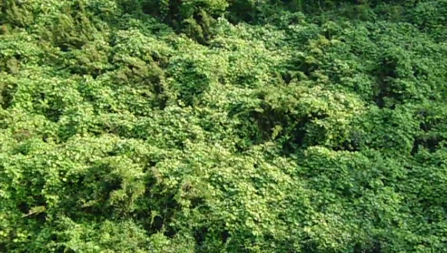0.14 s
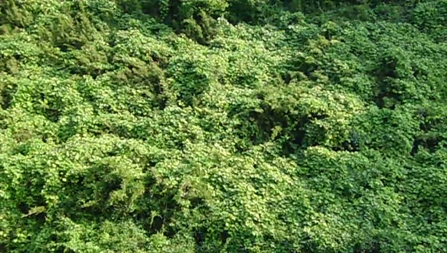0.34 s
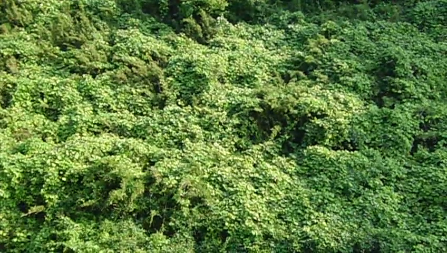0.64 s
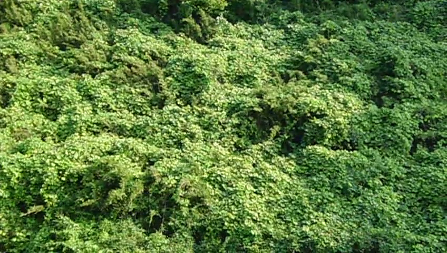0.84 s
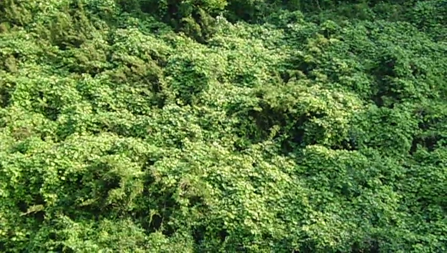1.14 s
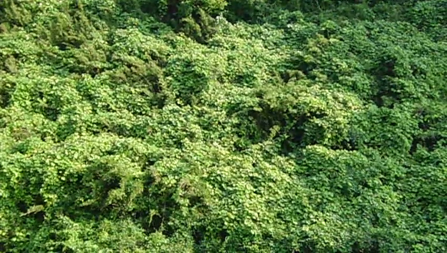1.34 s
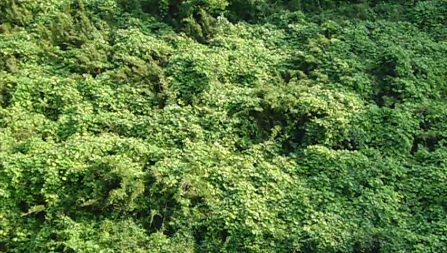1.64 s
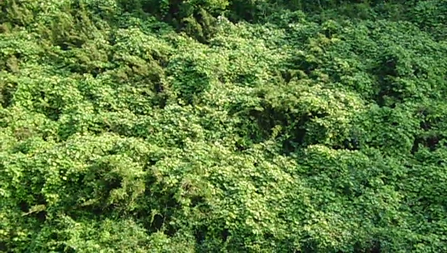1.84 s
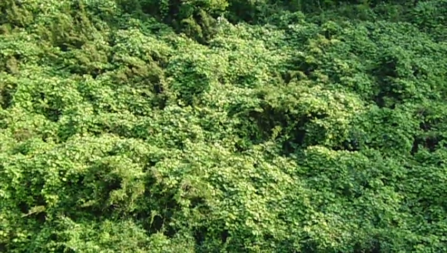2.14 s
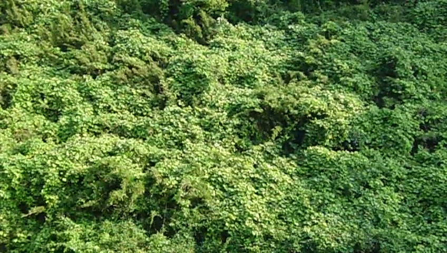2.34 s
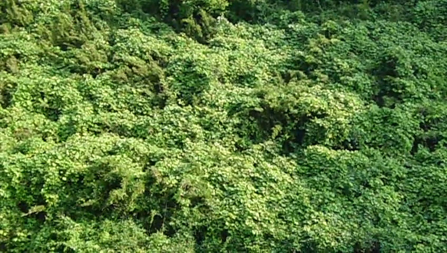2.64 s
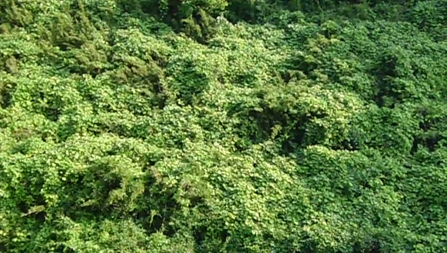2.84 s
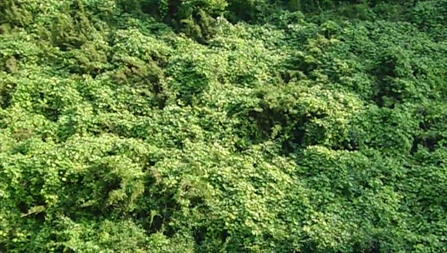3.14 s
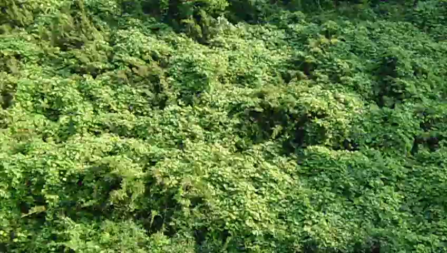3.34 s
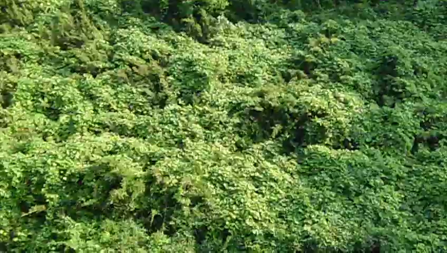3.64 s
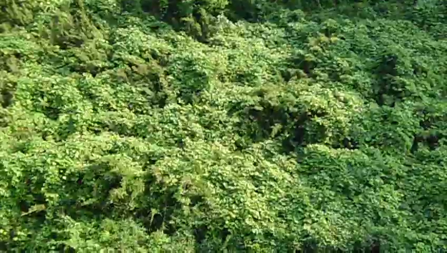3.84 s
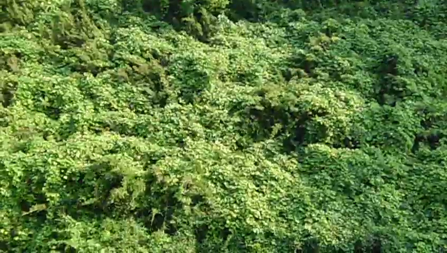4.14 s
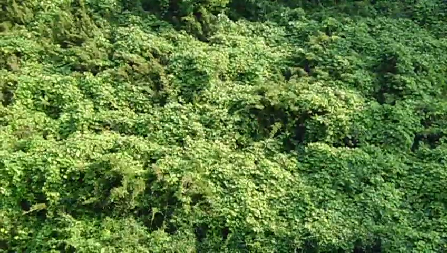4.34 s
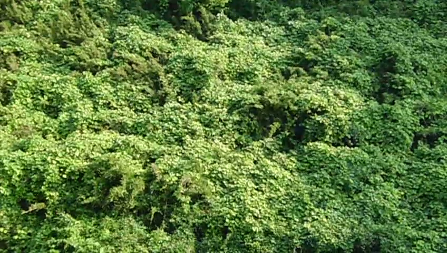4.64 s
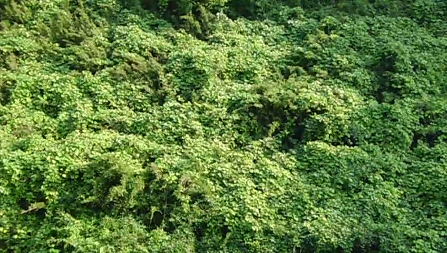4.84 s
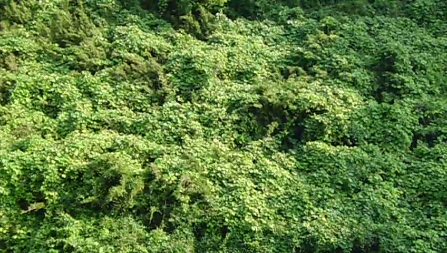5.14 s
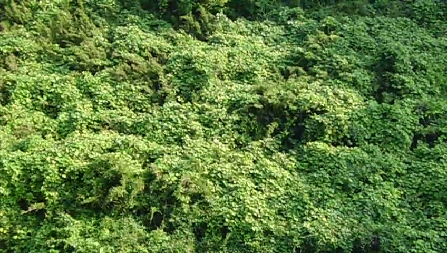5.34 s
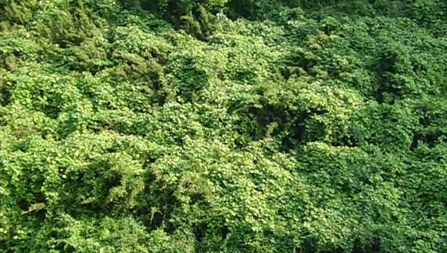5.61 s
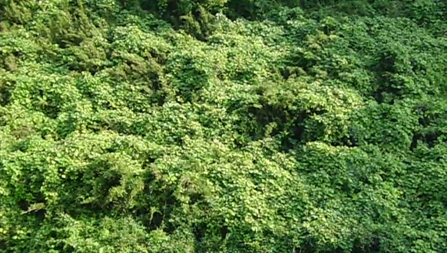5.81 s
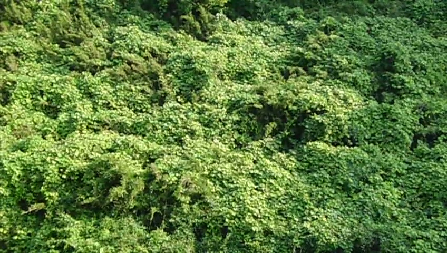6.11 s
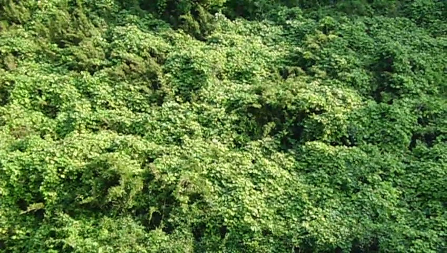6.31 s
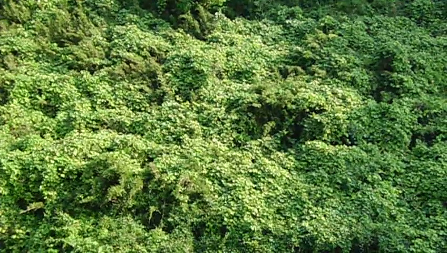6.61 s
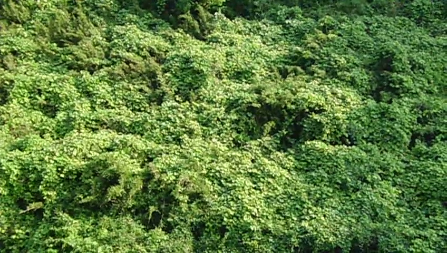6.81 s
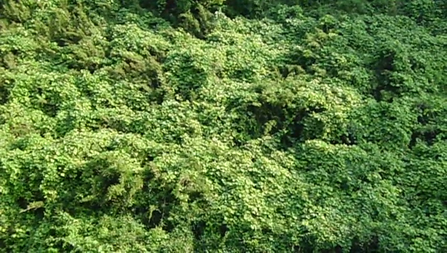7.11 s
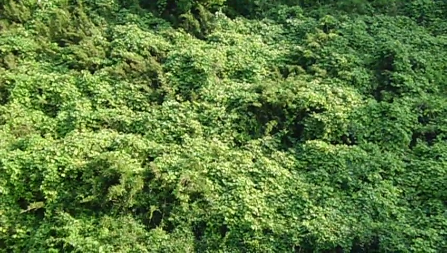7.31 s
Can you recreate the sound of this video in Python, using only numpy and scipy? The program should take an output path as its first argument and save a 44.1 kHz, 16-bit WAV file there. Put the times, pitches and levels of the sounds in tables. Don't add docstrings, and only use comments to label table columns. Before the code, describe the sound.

Outdoor insect chorus, recorded in mono from some distance. Shrill cicada pulses repeat about eight times a second, joined by thin upward-creeping buzzes and a dry, very fast high rattle. Just before four seconds a single bird call swells softly and snaps into four quick notes, echoing off the slopes. A tiny dull knock comes next. The rattle fades and the cicadas droop in pitch over faint breeze, distant traffic and hiss.

```python
import sys
import numpy as np
from scipy import signal
from scipy.fft import rfft, irfft, next_fast_len
from scipy.io import wavfile
from scipy.ndimage import uniform_filter1d, map_coordinates

SR = 44100
rng = np.random.default_rng(int(sys.argv[2]) if len(sys.argv) > 2 else 0)


def natural_amplitude(level_db):
    exponent = np.asarray(level_db, float) / 20
    return 10 ** exponent


def put_to_file(sound):
    columns = np.atleast_2d(sound).T
    safe = np.clip(columns, -1, 1)
    whole_steps = np.round(safe * 32767)
    wavfile.write(sys.argv[1], SR, whole_steps.astype(np.int16))


N = 329427
TIME = np.arange(N) / SR


def unit(x):
    return x / np.sqrt(np.mean(np.abs(x) ** 2) + 1e-20)


def along(points, hz):
    f, v = np.transpose(points)
    return np.interp(np.log(hz + 1), np.log(f + 1), v)


def curves(rows, t=TIME):
    s, *columns = np.transpose(rows)
    return [np.interp(t, s, column) for column in columns]


def wobble(rate):
    knots = rng.standard_normal(int(N * rate / SR) + 4)
    return map_coordinates(knots, [TIME * rate])


def coloured(x, spectrum):
    m = next_fast_len(N + 8192)
    gain = natural_amplitude(along(spectrum, np.fft.rfftfreq(m, 1 / SR)))
    return irfft(rfft(x, m) * gain, m)[:N]


def rush(spectrum, patchy_db):
    z = signal.stft(rng.standard_normal(N), nperseg=512)[2]
    field = uniform_filter1d(rng.standard_normal(z.shape), 5, 0)
    field = uniform_filter1d(field, 12, 1)
    noise = signal.istft(z * natural_amplitude(patchy_db * unit(field)), nperseg=512)[1][:N]
    return unit(coloured(noise, spectrum))


def whistle(rows):
    hz, db = curves(rows)
    on = (TIME > rows[0][0]) & (TIME < rows[-1][0])
    return on * np.sqrt(2) * natural_amplitude(db) * np.sin(2 * np.pi * np.cumsum(hz) / SR)


# frequency in Hz, time to fall 60 dB in seconds.
SLOPE_DECAY = [(800, 0.85), (2500, 0.75), (4200, 0.78), (9000, 0.59)]


def slope(x, wet_db):
    hz, t, z = signal.stft(rng.standard_normal(SR // 2), SR, nperseg=256)
    fall = natural_amplitude(-60 * t / along(SLOPE_DECAY, hz)[:, None])
    tail = signal.istft(z * fall, SR, nperseg=256)[1]
    late = np.pad(x, (600, 0))
    return natural_amplitude(wet_db) * signal.fftconvolve(late, tail / np.linalg.norm(tail))[:N]


def phrase(marked, steps, scatter_db=1.5, uneven=1):
    marks = np.cumsum([0] + steps)
    place = np.arange(marks[-1] + 1)
    rows = np.transpose([np.interp(place, marks, column) for column in np.transpose(marked)])
    scatter = [uneven * .005, uneven * 6, scatter_db]  # s, Hz, dB
    return rows + rng.standard_normal(rows.shape) * scatter


def singer(rows, tones_db, stroke_db, count, sag, gain_db=0):
    out, length = np.zeros(N + SR), .044
    lead_in = .1
    t = np.arange(round(.06 * SR)) / SR
    swell = natural_amplitude(5.9 * (t / length - 1))
    shape = swell * np.clip(t / 0.005, 0, 1) * np.clip((length - t) / .004 + 1, 0, 1)
    rows = np.array(rows)
    jitter = uniform_filter1d(rng.standard_normal((len(rows), 2, len(t))), 90, axis=2)
    drift, slip = jitter.transpose(1, 0, 2)
    click_hz = rows[:, 1:2] / 2 * (1 + sag * (.55 - t / length) + .022 * drift)
    start = count * rng.random((len(rows), 1))
    turn = 2j * np.pi * (np.cumsum(click_hz, axis=1) / SR + start)
    stack = np.polyval(natural_amplitude(tones_db)[::-1], np.exp(turn)) * np.exp(turn)
    muscle = turn / count + 3j * slip
    stroke = np.polyval(natural_amplitude(stroke_db)[::-1], np.exp(muscle)) * np.exp(-2 * muscle)
    level = natural_amplitude(rows[:, 2:] + gain_db + 2.5 + 12.0 * slip)
    calls = (stack * stroke).real * shape * level
    for s, call in zip(rows[:, 0], calls):
        out[round((s - .033 + lead_in) * SR):][:len(t)] += call
    return out[round(lead_in * SR):][:N]


STEPS = dict(NEAR=[2, 3, 2, 6, 8, 4, 3, 3], THIN=[3, 3, 6, 10], RISING=[4, 3, 3, 6, 5, 4, 3, 7],
         LOUD=[4, 2, 2, 1, 4, 1, 3, 3], HIGH=[1, 2, 2], LOW=[3, 6, 3, 3, 3, 7], AFTER=[1, 2, 5],
         LATE=[3, 3, 3, 3, 3], LAST=[1, 2, 5, 3])
# time in seconds, main pitch in Hz, level in dB.
NEAR = [
    (0.017, 4095, -68.8),
    (0.231, 4079, -62.2),
    (0.597, 4068, -61.4),
    (0.847, 4051, -57.6),
    (1.593, 4047, -58.1),
    (2.609, 4032, -58.2),
    (3.127, 4026, -54.4),
    (3.528, 4020, -58.4),
    (3.963, 4018, -59.4),
]
# time in seconds, main pitch in Hz, level in dB.
AFTER = [
    (4.074, 4031, -61.8),
    (4.198, 4014, -62.6),
    (4.545, 4031, -64.2),
    (5.163, 4029, -63.8),
]
NEAR_TONES = [-22, 2, -9, -17]
NEAR_STROKE = [-34, -11, 2, -32, -32.5, -28.5, -25, -19.5, -17]


def near_singer():
    steady = phrase(NEAR, STEPS["NEAR"], scatter_db=.5, uneven=.3)
    rows = np.vstack([steady, phrase(AFTER, STEPS["AFTER"])])
    fresh = np.clip((rows[:, 1:2] - 4040) / 40, 0, 1)
    sag = .0105 * (1 + fresh)
    return singer(rows, NEAR_TONES, NEAR_STROKE, count=8, sag=sag, gain_db=-0.03 + 0.78 * fresh)


# time in seconds, main pitch in Hz, level in dB.
THIN = [
    (0.317, 4270, -69.5),
    (0.675, 4341, -74.8),
    (1.028, 4438, -75.2),
    (1.719, 4415, -74.4),
    (2.944, 4380, -76.8),
]
RISING = [
    (2.781, 4231, -71.5),
    (3.214, 4401, -63.5),
    (3.688, 4434, -60.5),
    (4.037, 4403, -63.5),
    (4.725, 4386, -60.5),
    (5.337, 4376, -63.5),
    (5.906, 4336, -62.8),
    (6.302, 4326, -67.5),
    (7.14, 4282, -73.5),
]
LOUD = [
    (3.359, 4322, -64.5),
    (3.855, 4320, -65),
    (4.087, 4323, -55.8),
    (4.338, 4310, -56.2),
    (4.455, 4306, -63),
    (4.956, 4279, -60.8),
    (5.095, 4305, -59.5),
    (5.496, 4283, -61.2),
    (5.943, 4226, -67.2),
]
HIGH = [
    (3.619, 4669, -70.8),
    (3.745, 4675, -65.4),
    (3.995, 4666, -70.4),
    (4.261, 4658, -73.2),
]
LOW = [
    (3.913, 3926, -70.4),
    (4.263, 3908, -69.8),
    (5.003, 3892, -69.2),
    (5.401, 3881, -71.5),
    (5.782, 3877, -67),
    (6.163, 3869, -70),
    (7.033, 3836, -74.2),
]
LATE = [
    (5.391, 4011, -66.8),
    (5.772, 4014, -68.4),
    (6.153, 3994, -69.5),
    (6.526, 3989, -67),
    (6.901, 3983, -68),
    (7.321, 3961, -69.5),
]
LAST = [
    (5.941, 4205, -63.5),
    (6.087, 4184, -70.8),
    (6.358, 4156, -71.2),
    (7.055, 4126, -74.2),
    (7.457, 4101, -74.5),
]
OVERTONES = [-16, 0.5, -7, -11]
LOUD_TONES = [-8.5, 1.5, -9.5, -11]
RISING_TONES = [-13, 1.5, -9.5, -11]
LOW_STROKE = [-5, 0, 0, -9, -10, -14, -14, -14, -18]
HIGH_STROKE = [-30, -22, 0, -7, -20, -28, -30, -32, -34]
PLAIN_STROKE = [-18, -16, -1, -27, -23, -26, -21, -26, -25]


def other_singers():
    sag = .003
    low = singer(phrase(LOW, STEPS["LOW"]), NEAR_TONES, LOW_STROKE, count=15, sag=sag, gain_db=-1.0)
    high = singer(phrase(HIGH, STEPS["HIGH"]), NEAR_TONES, HIGH_STROKE, count=7, sag=sag, gain_db=4.0)
    loud = singer(phrase(LOUD, STEPS["LOUD"]), LOUD_TONES, PLAIN_STROKE, count=16, sag=sag, gain_db=-0.8)
    rising = phrase(RISING, STEPS["RISING"])
    rising = singer(rising, RISING_TONES, PLAIN_STROKE, count=16, sag=sag, gain_db=-0.1)
    plain = np.vstack([phrase(THIN, STEPS["THIN"]), phrase(LATE, STEPS["LATE"]), phrase(LAST, STEPS["LAST"])])
    plain = singer(plain, OVERTONES, PLAIN_STROKE, count=16, sag=sag, gain_db=2.5)
    return low + high + loud + rising + plain


def crowd(low_hz, high_hz, tire_hz, tones_db, count):
    rows = []
    for voice, (pace, start) in enumerate(rng.random((count, 2))):
        s = np.arange(start * .13, N / SR, .118 + .02 * pace)
        own_hz = low_hz + (high_hz - low_hz) * voice / (count - 1)
        pitch = own_hz - tire_hz * s + 12 * wobble(0.508)[(s * SR).astype(int)]
        rows += list(np.transpose([s, pitch, 3 * rng.standard_normal(len(s))]))
    direct = singer(rows, tones_db, PLAIN_STROKE, count=16, sag=0.0064)
    return unit(natural_amplitude(-4.5) * direct + slope(direct, 0))


# time in seconds, low voices in dB, high voices in dB.
FAR = [(0.0, -61.5, -79), (0.52, -66.5, -78), (2.49, -76.5, -82.5), (2.93, -69, -72.5), (3.16, -68.5, -62),
       (3.39, -61, -61.5), (3.56, -61.5, -59), (4.93, -65, -58.5), (5.8, -66.5, -61.5),
       (6.03, -69.5, -65.5), (6.41, -66, -63), (6.72, -69.5, -67), (7.47, -70.5, -73)]
CROWD_TONES = [-17, -1, -10, -11]


def far_chorus():
    low_db, high_db = curves(FAR)
    low = natural_amplitude(low_db) * crowd(3801, 4181, 8, OVERTONES, count=9)
    high = natural_amplitude(high_db) * crowd(4350, 4545, 30, CROWD_TONES, count=8)
    return low + high


# frequency in Hz, gain in dB.
BODY = [(1500, 2), (1750, 2), (2300, 4), (2600, -4.5), (3400, -4.5), (3780, -3.5), (4000, -1), (9500, 4),
        (11000, -11)]


def cicadas():
    near, rest = near_singer(), other_singers()
    echoes = slope(near, -9.0) + slope(rest, -8.0)
    return coloured(near + rest + echoes + far_chorus(), BODY)


def buzz(s, length, hz, creep, db):
    u = np.linspace(0, 1, 21)
    fade_db = 16 * abs(2 * u - 1) ** 8
    level = db + 4 * (u - .5) - fade_db
    return whistle(np.transpose([s + u * length, hz + creep * u * length, level]))


# start in seconds, length in seconds, first pitch in Hz,
# creep in Hz per second, loudest level in dB.
PURE_BUZZES = [
    (2.71, 1.49, 5872, 298, -73.2),
    (3.32, 1.79, 5582, 155, -72.2),
    (2.31, 1.29, 6282, 318, -80.2),
]
ROUGH_BUZZES = [
    (1.81, .94, 6512, 258, -76.2),
    (6.61, 1.09, 6402, 258, -77.2),
    (4.38, .32, 4935, 0, -74),
    (2.801, .041, 4902, 0, -72.5),
]
# time in seconds, level in dB.
DRONE = [(0.0, -63), (1.18, -61.5), (2.16, -65.5), (3.04, -66.5), (4.68, -62), (4.91, -66), (5.49, -61.5),
         (5.97, -65), (6.34, -63.5), (6.85, -68), (7.47, -66)]
DRONE_FAR = [(0, -71), (.6, -72.5), (1.18, -69.5), (3.5, -70.5), (7.47, -69.5)]
# frequency in Hz, level in dB per Hz.
DRONE_LOW = [(4500, -27), (5500, -12), (6300, -0.5), (7200, 2), (8000, -1), (9000, -25.5)]
DRONE_MID = [(7000, -23.5), (7800, -2.5), (8700, -0.5), (9800, -8), (10800, -10), (12000, -27),
             (13000, -36)]


def buzzers():
    notes = np.zeros(N)
    for row in PURE_BUZZES:
        notes += buzz(*row) * unit(.8 + wobble(80))
    for row in ROUGH_BUZZES:
        notes += buzz(*row) * unit(wobble(320))
    far = natural_amplitude(curves(DRONE_FAR)[0]) * rush(DRONE_LOW, patchy_db=2.0)
    nearer = natural_amplitude(curves(DRONE)[0] - 1.0) * rush(DRONE_MID, patchy_db=1.2)
    return notes + far + nearer


# time in seconds, how far it faces the microphone in dB.
RATTLE = [(0, 0.5), (1.34, 6.5), (1.37, -3), (2.25, -7.5), (3.66, 3.5), (4.3, -4), (4.55, 2), (4.75, -1),
          (5.72, -1), (5.83, -12), (7.23, -24), (7.47, -17)]
# time in seconds, wing strokes so far.
BEATS = [(0, -.2), (1, 31.94), (2.2, 70.15), (3.4, 108.85), (4.6, 147.38), (5.8, 185.41), (7.47, 238.6)]
# frequency in Hz, level in dB per Hz.
WING = [(6500, -33), (8000, -2), (9300, 3), (10500, -4.5), (12000, -33), (14000, -45)]
EDGE = [(9500, -10.5), (11500, 3.5), (13000, 0), (15600, 1)]


def katydid():
    beat = .5 + .5 * np.cos(2 * np.pi * curves(BEATS)[0])
    teeth = natural_amplitude(1.4 * wobble(22)) * rng.standard_normal(N) * (rng.random(N) < .4)
    facing_db, = curves(RATTLE)
    wing = unit(coloured(beat ** 1.5 * teeth, WING))
    edge = unit(coloured((0.45 + beat ** 2.3) * teeth, EDGE))
    return natural_amplitude(-66 + 0.39 * facing_db) * wing + natural_amplitude(-77 + facing_db) * edge


# time in seconds, pitch in Hz, level in dB.
HOO = [
    (2.98, 922, -92),
    (3.06, 925, -79.5),
    (3.3, 928, -75),
    (3.6, 936, -71),
    (3.74, 926, -76),
    (3.79, 925, -92),
]


def hoo():
    t = np.arange(HOO[0][0], HOO[-1][0], .002)
    hz, db = curves(HOO, t)
    turn = 2 * np.pi * 7.3 * (t - 3.355)
    return whistle(np.transpose([t, hz + 12 * np.cos(turn - 1.4), db + 5 * np.cos(turn)]))


# time in seconds, pitch in Hz, level in dB.
QUICK_NOTES = [
    [(3.706, 1720, -85), (3.712, 1735, -65), (3.718, 1780, -63), (3.728, 1745, -66), (3.732, 1700, -85)],
    [(3.722, 1520, -85), (3.728, 1450, -62), (3.736, 1350, -59), (3.746, 1470, -59), (3.761, 1790, -55),
     (3.77, 1900, -52), (3.781, 1927, -54), (3.791, 1948, -62), (3.797, 1948, -85)],
    [(3.798, 1925, -85), (3.806, 1925, -61), (3.816, 1915, -58), (3.822, 1915, -85)],
    [(3.819, 2700, -85), (3.825, 2590, -51), (3.839, 2250, -50), (3.851, 1800, -58), (3.861, 1450, -61),
     (3.876, 1220, -66), (3.9, 1165, -70), (3.91, 1160, -88)],
]
# frequency in Hz, echo gain in dB.
CARRY = [(900, -3), (1500, -3), (2000, -2), (2400, -2), (3000, 8)]


def warbler():
    song = hoo() * (1 + 0.18 * wobble(40)) + sum(whistle(rows) for rows in QUICK_NOTES)
    bank = natural_amplitude(-10) * np.roll(song, round(.025 * SR)) + natural_amplitude(-9) * np.roll(song, round(.078 * SR))
    return song + coloured(natural_amplitude(-7.0) * bank + slope(song, -6.0), CARRY)


# time in seconds, peak level in dB.
TICK = [
    (4.229, -50.5),
]


def knock():
    out, t = np.zeros(N), np.arange(300) / SR
    for s, db in TICK:
        out[round(s * SR):][:len(t)] += natural_amplitude(db - 60 * t / 0.0046) * np.sin(2 * np.pi * 1150 * t)
    return out


# time in seconds, level in dB.
HUM = [(0, -76), (1.3, -76), (2.7, -83), (2.9, -65.5), (3.2, -71.5), (3.35, -81), (3.6, -72.5),
       (3.9, -83.5), (5.9, -78.5), (7.47, -88)]
# time in seconds, level in dB.
RUMBLE = [(0, -67), (4.2, -67), (4.6, -68), (7.47, -65.5)]
# frequency in Hz, level in dB per Hz.
AIR = [(8.8, -44.5), (15, -6.5), (19, -17), (22, -18.5), (27, -14.5), (54, -15.5), (119, -24.5), (270, -30),
       (342, -36), (1150, -38.5), (1600, -56.5), (2080, -83), (3520, -120)]


def air():
    hum = (1 + 0.43 * wobble(14)) * np.sin(2 * np.pi * 270 * TIME)
    hum += natural_amplitude(2.0) * wobble(40) * np.sin(2 * np.pi * 225 * TIME)
    rumble = natural_amplitude(curves(RUMBLE)[0] + 2.5) * rush(AIR, patchy_db=-0.5)
    return rumble + natural_amplitude(curves(HUM)[0] - 4) * hum


def scene():
    return (cicadas() + buzzers() + katydid() + warbler() + knock() + air())[None]


def roll_off(x):
    return signal.sosfilt(signal.butter(12, 15630, fs=SR, output="sos"), x)


# frequency in Hz, level in dB per Hz.
HISS = [(1000, 5), (3000, -2.5), (6000, -5.5), (11000, -2.5), (16000, -9)]


def record(dry):
    hiss = natural_amplitude(-71) * coloured(rng.standard_normal(N), HISS)
    mix = dry + hiss + 0.0069
    return roll_off(mix)


dry = scene()
out = record(dry)
put_to_file(out)
```